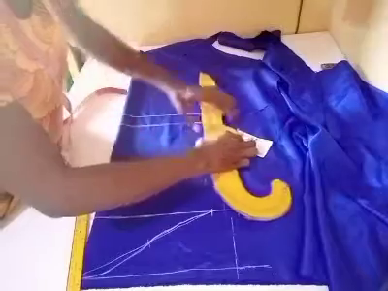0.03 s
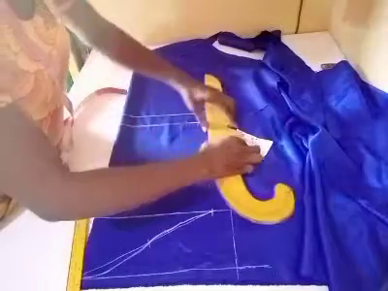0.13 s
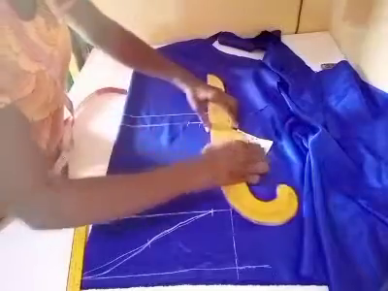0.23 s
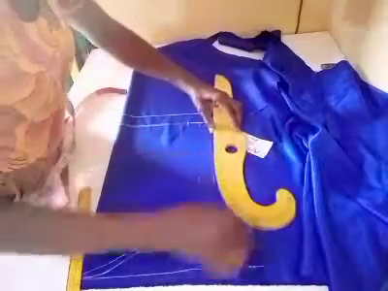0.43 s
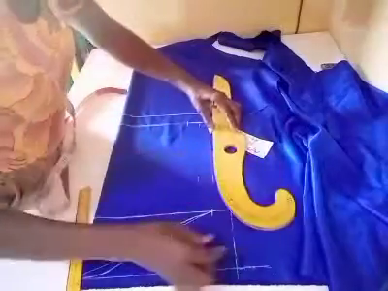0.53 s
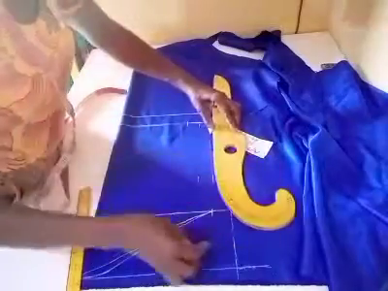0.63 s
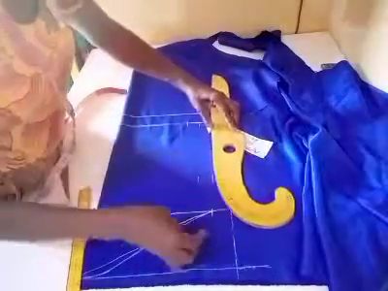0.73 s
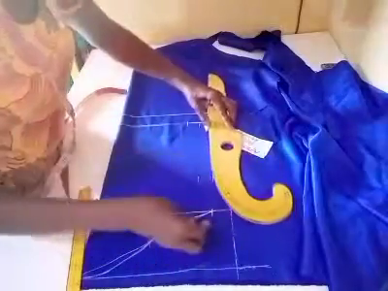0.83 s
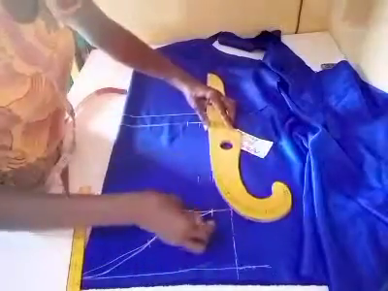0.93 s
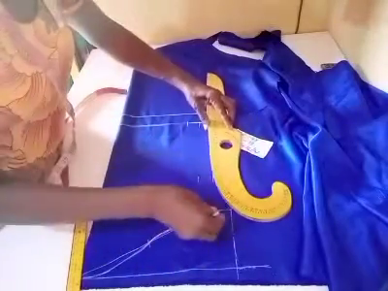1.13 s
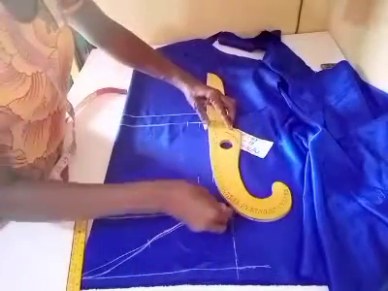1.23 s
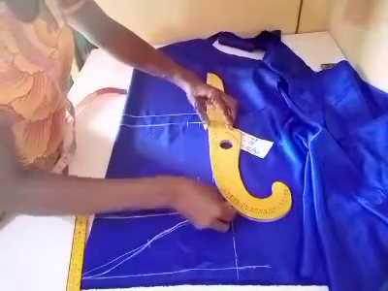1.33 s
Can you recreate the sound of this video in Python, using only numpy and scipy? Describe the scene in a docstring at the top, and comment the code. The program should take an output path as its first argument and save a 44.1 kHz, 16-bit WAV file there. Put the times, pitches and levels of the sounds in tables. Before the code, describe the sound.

A plastic ruler lands on a cloth-covered table with a dull knock. It squeaks thinly as it is pressed into place, while hands brush the fabric with light ticks and one short scrape, close by in a small room.

```python
"""Hands brush over cloth, then a table top knocks as a plastic ruler lands on the cloth covering it.
A thin squeak rises in short slips while the ruler is pressed into place. Plastic and fingernails tick;
threads catch and let go under the hands, which make one short, firm scrape.
A low rumble and a wavering hum lie underneath, in a small room."""
import sys
import numpy as np
from scipy import signal
from scipy.fft import rfft, irfft
from scipy.io import wavfile

SR = 44100
rng = np.random.default_rng(int(sys.argv[2]) if len(sys.argv) > 2 else 0)


def dump_mix(stems):
    """Bounce the given channels to the path in sys.argv[1] as a 16-bit WAV at rate SR."""
    frames = np.atleast_2d(stems).T  # one column per channel
    limited = np.clip(frames, -1, 1)  # hard clip at full scale
    pcm = np.round(limited * 32767).astype(np.int16)
    wavfile.write(sys.argv[1], SR, pcm)


N = 61739
T = np.arange(N) / SR


def from_db(db):
    """Decibels to gain."""
    return 10 ** (np.asarray(db) / 20)


def unit_rms(x):
    """Scale to unit power."""
    return x / np.sqrt(np.mean(x ** 2) + 1e-20)


def lowpass(x, hz, order=2):
    """Butterworth low-pass."""
    return signal.sosfilt(signal.butter(order, min(hz, .45 * SR), fs=SR, output="sos"), x)


def colour(x, spectrum):
    """Filter by a (freq_hz, gain_db) curve, then scale to unit power."""
    freq_hz, gain_db = np.transpose(spectrum)
    bins_hz = np.maximum(np.fft.rfftfreq(N, 1 / SR), 1)
    gain = from_db(np.interp(np.log(bins_hz), np.log(freq_hz), gain_db))
    return unit_rms(irfft(rfft(x) * gain, N))


def noise(spectrum):
    """Coloured Gaussian noise, unit power."""
    return colour(rng.standard_normal(N), spectrum)


def drift(rate_hz):
    """Random wander below rate_hz, unit power."""
    return unit_rms(lowpass(rng.standard_normal(2 * N), rate_hz)[N:])


def decay(start_s, t60_s):
    """Sudden start, exponential fall."""
    return (T >= start_s) * np.exp(-np.log(1000) * np.maximum(T - start_s, 0) / t60_s)


# Rumble and faint hiss: freq_hz, gain_db
RUMBLE_SPECTRUM = [(25, -9), (55, -3), (95, -1), (175, 0), (245, -17.5), (340, -8.5), (470, -20.5),
                   (1000, -21), (2100, -25), (2800, -25), (4200, -36.5), (5600, -22.5), (9200, -44),
                   (11500, -64), (15500, -35)]
# Hum tones: pitch_hz, rms_db
HUM_TONES = [(106, -61), (138, -62), (312, -61)]

def background():
    """Steady room rumble and a hum whose tones waver in pitch and level."""
    hum = np.zeros(N)
    for pitch_hz, rms_db in HUM_TONES:
        amplitude = np.sqrt(2) * from_db(rms_db + 3.5 * drift(rate_hz=28))
        wavering_hz = pitch_hz * (1 + .025 * drift(rate_hz=25))
        hum += amplitude * np.sin(2 * np.pi * np.cumsum(wavering_hz) / SR)
    return from_db(-56.5) * noise(RUMBLE_SPECTRUM) + hum


# Table and wall reflections: delay_s, gain_db
REFLECTIONS = [(.0013, -48), (.0037, -20.5), (.0071, -20), (0.0113, -17.5)]

def room(x, tail_db):
    """Direct sound, near reflections and a dull, diffuse tail."""
    echoes = sum(from_db(gain_db) * np.interp(T - delay_s, T, x, left=0)
                 for delay_s, gain_db in REFLECTIONS)
    tail = lowpass(rng.standard_normal(N), hz=6600, order=1) * decay(start_s=.0046, t60_s=.31)
    reverb = signal.fftconvolve(x, tail / np.sqrt(np.sum(tail ** 2)))[:N]
    return from_db(-1) * (x + echoes) + from_db(tail_db) * reverb


def weave(spectrum, grains_per_s=3900, spread_db=1.5):
    """Threads catch and let go: dense, uneven grains over a smooth hiss."""
    sizes = from_db(spread_db * np.minimum(rng.exponential(1, N), 4))
    signs = rng.choice([-1, 1], N)
    grains = unit_rms(sizes * signs * (rng.random(N) < grains_per_s / SR))
    return colour(grains + .64 * rng.standard_normal(N), spectrum)


# Light brushing, pressed rubbing, fine fibres: freq_hz, gain_db
SWISH_SPECTRUM = [(300, -17), (1000, -34), (2200, -3.5), (4000, 0), (6800, 2), (9000, -7), (12000, -24),
                  (15500, -32)]
FRICTION_SPECTRUM = [(150, -9), (490, -6), (760, -5), (1050, 1), (1600, -1), (2200, 0), (4000, -4.5),
                     (6500, -13.5), (9000, -45), (14000, -66)]
SIZZLE_SPECTRUM = [(3000, -52), (8000, 3.5), (10500, 2.5), (13000, -8.5), (15200, 11), (16000, -2.5)]
# Hand strokes: start_s, rise_s, hold_s, t60_s, level_db, friction_rel_db, sizzle_rel_db
HAND_STROKES = [(-0.02, 0.023, 0.017, 0.25, -52.5, -13, -18), (0.07, .02, 0.034, 0.08, -60, -3.5, -8),
                (0.134, 0.014, 0.093, 0.13, -55.5, -8, -12.5), (0.246, 0.0074, 0.049, 0.1, -57, 5.5, -9),
                (0.334, 0.017, .01, 0.17, -57.5, -0.5, -4), (0.365, 0.027, 0.024, 0.38, -57.5, -2, -7.5),
                (0.526, 0.039, 0.0091, 0.18, -55, -19, -4.5), (0.578, 0.024, 0.019, 0.22, -53, -5, -11.5),
                (0.689, 0.015, 0.035, 0.12, -55, -8, -6), (0.726, 0.016, 0.013, 0.16, -54.5, 3, -5),
                (0.807, .018, 0.015, 0.21, -52, 1, -5), (0.848, 0.06, 0.12, 0.75, -60, -17, -15),
                (0.977, 0.023, 0.0021, 0.05, -43, -3, -10), (1.002, 0.0097, 0.013, 0.042, -41.5, -0.5, -11),
                (1.016, 0.0047, 0.019, .05, -53.5, -3, -3), (1.051, 0.0051, 0.0092, 0.072, -57.5, 5.5, -8),
                (1.181, 0.0099, 0.0051, 0.16, -70.5, 20.5, -35), (1.228, 0.018, 0.043, .2, -68, -9, -9.5),
                (1.31, 0.013, 0.067, .2, -60.5, 1, -13)]

def cloth_strokes():
    """Hands swish over cloth; pressure adds darker friction, speed a fine sizzle."""
    swish, friction, sizzle = weave(SWISH_SPECTRUM), weave(FRICTION_SPECTRUM), weave(SIZZLE_SPECTRUM)
    out = np.zeros(N)
    for start_s, rise_s, hold_s, t60_s, level_db, friction_rel_db, sizzle_rel_db in HAND_STROKES:
        swell = np.clip((T - start_s) / rise_s, 0, 1)
        release = from_db(-60 * np.maximum(T - start_s - rise_s - hold_s, 0) / t60_s)
        rub = swish + from_db(friction_rel_db) * friction + from_db(sizzle_rel_db) * sizzle
        out += from_db(level_db) * swell * release * rub
    return out


# Hard contact: freq_hz, gain_db
TICK_SPECTRUM = [(300, -46), (1000, -3), (2500, -3.5), (5000, 5), (7500, 1.5), (12000, -10), (15500, 1)]
# Plastic and fingernail touches: start_s, level_db, lowpass_hz
LIGHT_TOUCHES = [(0.2626, -39.5, 10700), (0.27, -40.5, 16000), (0.542, -38, 15700), (0.5502, -38.5, 16000),
                 (0.748, -43.5, 15800), (0.762, -54, 10800), (0.9955, -31.5, 6950), (1.0057, -28, 13100),
                 (1.183, -40, 4930), (1.197, -55, 3250)]

def ticks():
    """Small hard contacts that die at once."""
    crack = noise(TICK_SPECTRUM)
    return sum(from_db(level_db) * lowpass(crack * decay(start_s, t60_s=.028), lowpass_hz, order=4)
               for start_s, level_db, lowpass_hz in LIGHT_TOUCHES)


# Ruler slips: start_s, length_s, from_hz, to_hz, level_db
RULER_SLIPS = [(0.195, 0.035, 2990, 3220, -47.5), (0.463, 0.046, 2492, 2596, -48),
               (0.506, 0.036, 2787, 2868, -46), (0.52, 0.024, 2566, 2540, -53),
               (0.544, .048, 2842, 2840, -55), (0.597, 0.044, 2580, 2508, -49.5),
               (0.598, .04, 2800, 2850, -52), (0.64, 0.037, 2830, 2890, -49.5),
               (0.665, 0.0475, 3170, 3320, -57), (0.687, 0.0253, 2853, 2920, -47.5)]

def ruler_squeaks(jitter=.05, fade_s=.006):
    """The pressed ruler slips in short, unsteady tones, each gliding a little."""
    out = np.zeros(N)
    for start_s, length_s, from_hz, to_hz, level_db in RULER_SLIPS:
        end_s = start_s + length_s
        glide_hz = np.interp(T, [start_s, end_s], [from_hz, to_hz])
        pitch_hz = glide_hz * (1 + jitter * drift(rate_hz=700))
        envelope = np.clip(np.minimum(T - start_s, end_s - T) / fade_s, 0, 1)
        out += from_db(level_db) * envelope * np.sin(2 * np.pi * np.cumsum(pitch_hz) / SR)
    return out


# Pushes on the table as the ruler comes down: start_s, level_db
HAND_PUSHES = [(0.188, -40), (0.2209, -26), (0.2474, -22)]

def hand_thumps(pitch_hz=108, t60_s=.047):
    """Soft pushes on the table, damped by the hand within a few cycles."""
    out = np.zeros(N)
    for start_s, level_db in HAND_PUSHES:
        out += from_db(level_db) * decay(start_s, t60_s) * np.sin(2 * np.pi * pitch_hz * (T - start_s))
    return lowpass(out, hz=350)


# Dense, short ring of the ruler: freq_hz, gain_db
CLACK_SPECTRUM = [(60, 9.5), (250, -5), (500, 7.5), (900, -2.5), (1400, -5), (2400, 1.5), (3200, -7.5),
                  (5000, -18), (12000, -44)]
# Landing and settling: start_s, rel_db, lowpass_hz
RULER_CONTACTS = [(0.2395, -3.5, 3100), (0.2445, 0, 705), (0.255, -2.5, 920), (0.274, -13.5, 2010),
                  (0.298, -7, 640)]

def ruler_clacks(level_db=-24):
    """Each contact of the ruler is a short clack with its own loudness and brightness."""
    out = np.zeros(N)
    for start_s, rel_db, lowpass_hz in RULER_CONTACTS:
        ring = noise(CLACK_SPECTRUM) * decay(start_s, t60_s=.055)
        out += from_db(level_db + rel_db) * lowpass(ring, lowpass_hz)
    return out


# Table top resonances: pitch_hz, level_db, t60_s
TABLE_TOP_MODES = [(84, -37, .14), (108, -32, .48), (195, -37, .19), (240, -45, .12), (294, -44, .22),
                   (430, -34, .08), (471, -31, .19), (533, -35, .18), (584, -39, .2), (651, -43, .17),
                   (712, -40, .15), (886, -43, .13), (975, -44, .12), (1177, -45, .15), (1740, -47, .1),
                   (2030, -45, .09), (2610, -45, .09)]

def table_knock(landing_s=.2398, rise_s=.006):
    """The landing, cushioned by the cloth, sets the table's modes ringing."""
    age_s = T - landing_s
    ring = sum(from_db(level_db) * decay(landing_s, t60_s) * np.sin(2 * np.pi * pitch_hz * age_s)
               for pitch_hz, level_db, t60_s in TABLE_TOP_MODES)
    return np.clip(age_s / rise_s, 0, 1) * ring


def scene():
    """Landing, handling and squeaks over the room's background; mono."""
    landing = hand_thumps() + table_knock() + room(ruler_clacks(), tail_db=-10.5)
    handling = room(ticks() + cloth_strokes(), tail_db=-13.5)
    squeaks = room(ruler_squeaks(), tail_db=-7)
    return (landing + handling + squeaks + background())[None]


def record(dry, low_cut_hz=79, high_cut_hz=15900):
    """A small microphone loses the deep bass; the top is cut steeply."""
    low_cut = signal.butter(2, low_cut_hz, "high", fs=SR, output="sos")
    high_cut = signal.ellip(10, .1, 60, high_cut_hz, fs=SR, output="sos")
    return signal.sosfiltfilt(high_cut, signal.sosfilt(low_cut, dry))


dry = scene()
out = record(dry)
dump_mix(out)
```